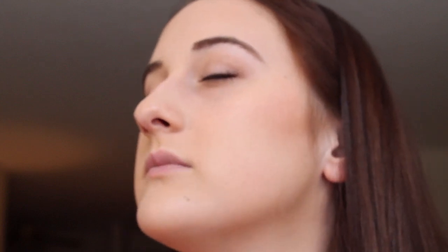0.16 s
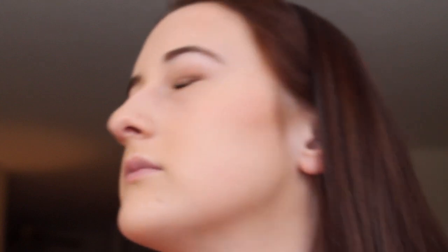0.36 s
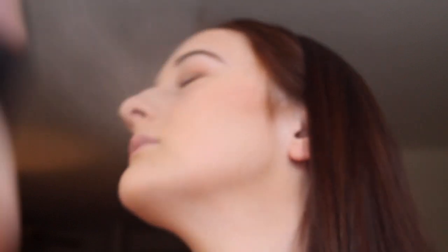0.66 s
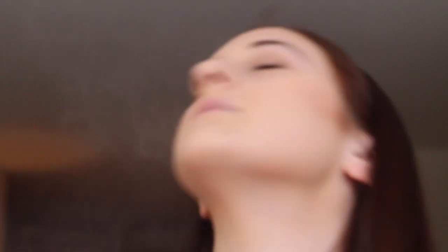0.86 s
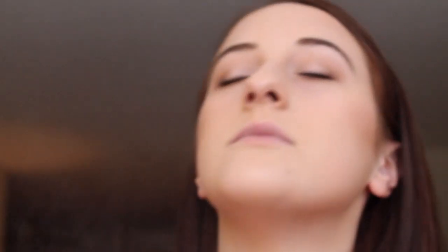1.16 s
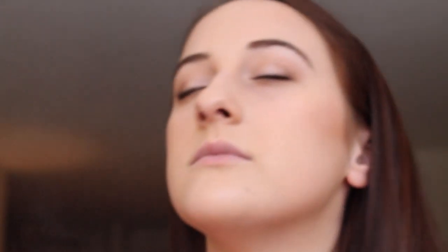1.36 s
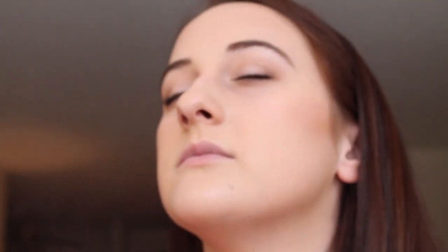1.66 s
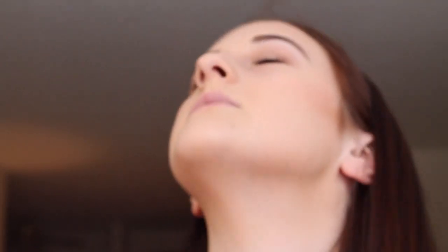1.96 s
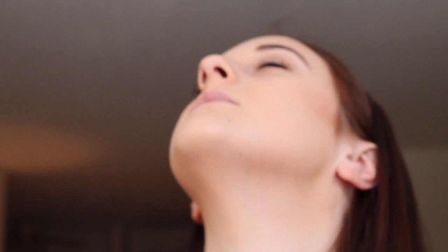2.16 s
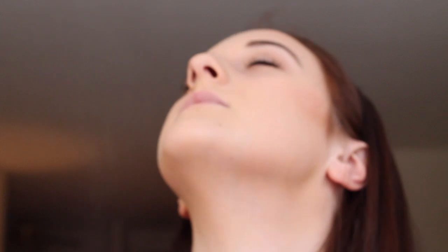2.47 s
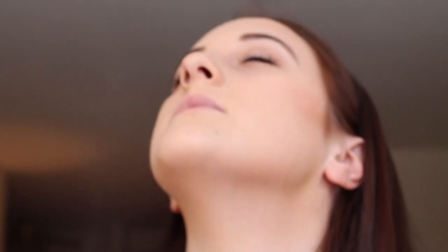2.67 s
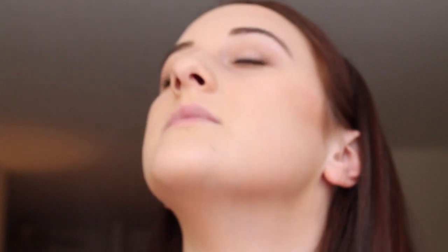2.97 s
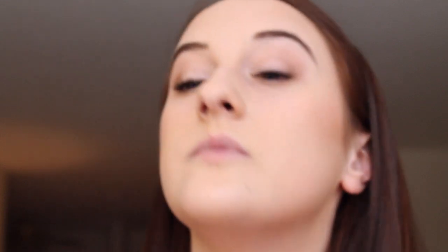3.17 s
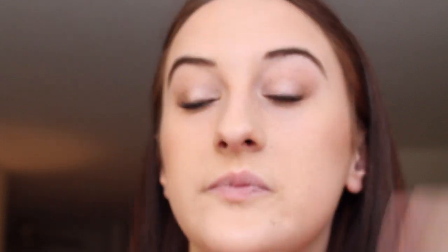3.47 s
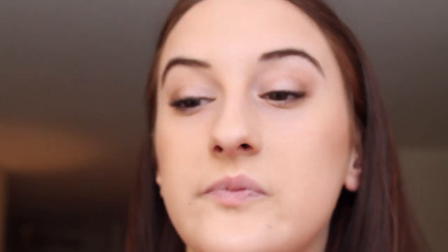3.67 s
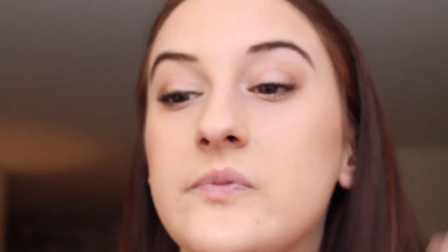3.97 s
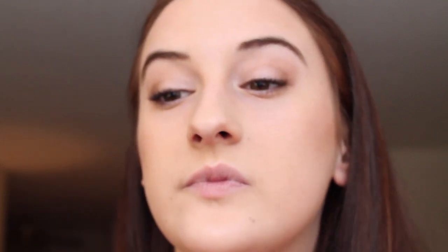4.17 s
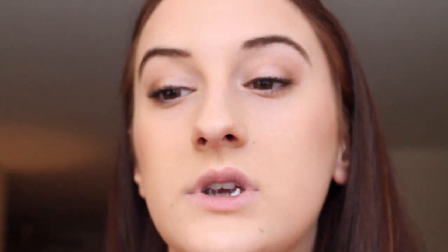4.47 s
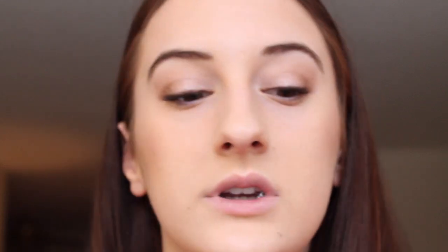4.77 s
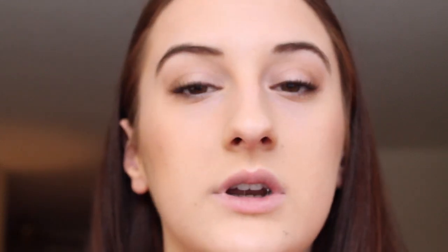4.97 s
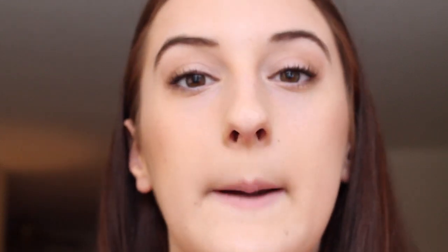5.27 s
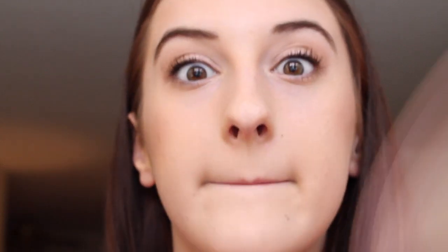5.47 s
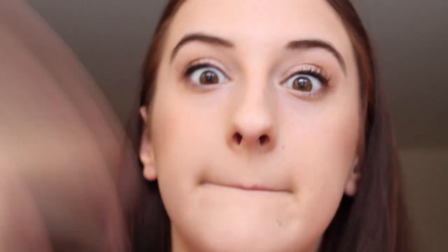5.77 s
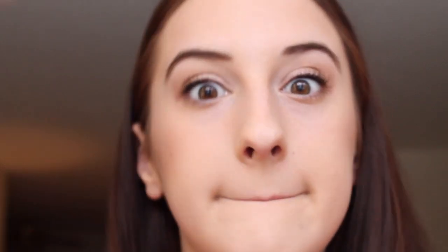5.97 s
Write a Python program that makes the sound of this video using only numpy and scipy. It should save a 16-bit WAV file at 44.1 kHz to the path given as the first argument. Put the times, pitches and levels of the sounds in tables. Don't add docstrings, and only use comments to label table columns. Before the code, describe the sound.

A small pump bottle gives five short misty spritzes with plastic clicks, then a cap snaps on and the bottle knocks onto wood.

```python
import sys
import numpy as np
from scipy import signal
from scipy.io import wavfile
from scipy.ndimage import uniform_filter1d

SR = 44100
rng = np.random.default_rng(int(sys.argv[2]) if len(sys.argv) > 2 else 0)


def unload_audio(sound):
    columns = np.transpose(np.atleast_2d(sound))
    steps = np.round(np.clip(columns, -1, 1) * 32767)
    wavfile.write(sys.argv[1], SR, steps.astype(np.int16))


def natural_amplitude(level_db):
    exponent = np.asarray(level_db, float) / 20
    return 10 ** exponent


N = 269719

# f/Hz, level/dB per Hz
HUSH_COLOUR = [(25, 3), (50, -6.5), (120, -3), (200, -0.5), (320, -0.5), (500, -3.5), (630, -6.5),
               (1000, -8.5), (2000, -16), (4000, -19.5), (8000, -24.5), (10000, -30), (15700, -31),
               (16000, -51)]
HUSH_DB = -59
WHINE_HZ, WHINE_DB = 1071, -73.5

# f/Hz, level/dB per Hz
FINGER_COLOUR = [(250, -27), (500, -7), (850, -0.5), (1500, -2.5), (2400, -1.5), (3100, -13), (5000, -18),
                 (12000, -44)]
# t/s, level/dB
FINGER_BLOWS = [
    (.3337, -21.5),
]

# t/s, peak level/dB, ring f/Hz, upper mode relative level/dB
KNOCKS = [(0.3345, -37.5, 840, -3), (0.374, -32, 734, 0.5), (0.385, -38, 790, -3), (0.396, -34.5, 776, -2),
          (0.414, -33, 880, -5), (0.558, -35, 763, -20), (0.674, -40, 860, -10), (0.694, -37, 1310, -11),
          (0.815, -23, 869, -12), (0.824, -34, 910, -8), (0.878, -40, 830, 0), (1.079, -29.5, 904, -10),
          (1.088, -37.5, 865, -5), (1.373, -29.5, 820, 2), (1.846, -37.5, 980, 2), (2.035, -43.5, 835, -11),
          (2.11, -47, 1020, 4), (2.0686, -25.5, 850, -2.5), (2.692, -43, 965, 2.5), (2.743, -44, 920, -2)]
KNOCK_T60_S = 0.022

# f/Hz, level/dB per Hz
MIST_COLOUR = [(300, -52), (700, -11.5), (1300, -4.5), (2200, 0.5), (4000, 5.5), (6500, 3.5), (8500, 0.5),
               (10500, -9), (13500, -9), (15700, -11), (16000, -48)]
# start t/s, push length/s, jet level/dB, run-down/s, fizz above 9 kHz relative level/dB
PRESSES = [
    (0.369, 0.099, -41.5, 0.061, 2.5),
    (0.635, 0.091, -39, 0.046, 6),
    (0.906, 0.079, -43, 0.073, 6.5),
    (1.193, 0.09, -44, 0.057, 2.5),
    (1.795, 0.14, -41, 0.015, 2),
]
# start t/s, length/s, hiss level/dB, run-down/s, fizz relative level/dB
REFILLS = [
    (0.534, 0.019, -53, .012, -8),
    (0.795, 0.017, -52, .01, -9),
    (1.35, 0.0072, -54, .01, -4),
    (2.035, 0.023, -57, .012, -7),
]
OPEN_DB, BUILD_SHARE, SHUT_DB = -12, 0.18, -23
FIZZ_FOLLOWS = 0.16

# t/s, peak level/dB, ring f/Hz, bright crack relative level/dB
PUMP_TICKS = [(0.398, -34, 7000, 5), (0.501, -37, 5870, -16), (0.5346, -25.5, 2860, -18),
              (0.6068, -35.5, 3590, -15), (0.6194, -49, 2900, -14), (0.634, -52, 3600, 6),
              (0.6429, -28, 3330, -14), (0.674, -49, 7040, 2), (0.694, -37, 7000, 2),
              (0.7956, -33, 4300, -1), (0.861, -47, 3060, -16), (0.8785, -31, 4500, -15),
              (1.0434, -32, 4400, -17), (1.061, -35, 2870, 0), (1.0704, -49, 3290, -14),
              (1.342, -53, 2490, -14), (1.3519, -29.5, 2840, -11), (1.8454, -43, 5300, -2),
              (2.0347, -33, 3000, -3), (2.0434, -50, 2010, -14)]
# t/s, peak level/dB, ring f/Hz, bright crack relative level/dB
HAND_TICKS = [(1.6575, -40, 4340, -20), (2.6748, -48.5, 2310, -4), (2.7106, -47, 2700, -14),
              (2.7417, -45.5, 2900, -16), (2.8218, -46, 3780, -14), (3.1968, -53, 1770, -2),
              (3.548, -49, 1890, -14), (4.3847, -48, 3920, 10), (4.3884, -24.5, 6200, -26),
              (4.4024, -55, 5930, -14), (4.4114, -50, 4180, -14), (4.4165, -45, 3940, -14),
              (4.557, -42, 1850, -10), (4.5633, -38.5, 3930, -14), (4.7803, -56, 1970, -18),
              (5.34, -54, 2000, 3)]
TICK_CYCLES, CRACK_DB = 16.6, -3

# t/s, peak level/dB, ring f/Hz, ring t60/s
BUMPS = [
    (2.353, -45, 1380, 0.034),
    (2.931, -27.5, 1700, 0.0062),
    (4.5575, -40, 1685, 0.031),
    (4.755, -44, 1590, 0.033),
    (5.315, -46.5, 404, 0.067),
    (4.770, -41, 1592, 0.037),
    (4.782, -41.5, 1580, 0.015),
]
RISE_SHARE, LOWER_DB = 0.046, -5

# f/Hz, level/dB per Hz
CAP_COLOUR = [(290, -56), (500, -27), (800, -6.5), (1450, -9), (1900, 0.5), (2800, 1.5), (3900, 3.5),
              (4800, 4.5), (6300, -0.5), (7800, -0.5), (10500, -14.5), (14500, -17), (16300, -44)]
# t/s, level/dB
CAP_BLOWS = [
    (2.9333, -6),
    (2.9342, -17),
    (2.9417, -37),
]
# f/Hz, level/dB, t60/s
CAP_MODES = [(1070, -38, 0.061), (2000, -32, 0.037), (2900, -23, 0.013), (3920, -22, 0.017),
             (4770, -26.5, 0.043), (6000, -26, 0.015), (7100, -32, 0.0096)]

# f/Hz, level/dB per Hz
TABLE_COLOUR = [(60, -53), (100, -22), (200, -14), (310, -19.5), (400, 0), (800, -3.5), (1100, -7.5),
                (1500, -10), (2000, -13), (2600, -15), (3300, -27), (4600, -27.5), (6000, -38),
                (12000, -60)]
# t/s, level/dB
TABLE_BLOWS = [
    (5.1195, -6.5),
    (5.1294, -18),
]
# f/Hz, level/dB, t60/s
TABLE_MODES = [(388.4, -20, 0.11), (590, -35, 0.086), (745, -26, 0.09), (1000, -18.5, 0.039),
               (1200, -33.5, 0.15), (1250, -47, .1), (1580, -42, 0.1), (1714, -29, 0.067),
               (2230, -34, 0.053), (2640, -57, 0.043), (4800, -42, 0.051)]

# f/Hz, t60/s
ROOM_DECAY = [(250, 0.72), (700, 0.37), (2000, 0.47), (5000, 0.42), (9000, 0.26), (16000, 0.31)]
# delay t/s, level/dB
ECHOES = [
    (.0075, -14.5),
    (.017, -30.5),
    (.042, -21.5),
]


def evened(x):
    return x / np.sqrt(np.mean(x ** 2) + 1e-20)


def read(points, hz):
    f, value = np.transpose(points)
    return np.interp(np.log(hz + 1), np.log(f + 1), value)


def add(mix, s, sound):
    part = mix[round(s * SR):][:len(sound)]
    part += sound[:len(part)]


def noise(spectrum, patchy_db, size):
    frames, hz = 4 * N // size + 5, np.fft.rfftfreq(size, 1 / SR)
    real, imaginary, patches = rng.standard_normal((frames, len(hz), 3)).T
    patches = uniform_filter1d(patches, size=8, axis=0)
    patches = evened(uniform_filter1d(patches, size=8, axis=1))
    gain = natural_amplitude(read(spectrum, hz)[:, None] + patchy_db * patches)
    z = (real + 1j * imaginary) * gain
    return evened(signal.istft(z, nperseg=size, noverlap=3 * size // 4)[1][:N])


def ring(hz, t60, rise):
    t = np.arange(SR // 4) / SR
    decay = natural_amplitude(-60 * t / max(t60, .001))
    return decay * np.sin(2 * np.pi * hz * t) * (1 - np.exp(-t / rise))


def crack(low_hz, high_hz, t60):
    t = np.arange(SR // 4) / SR
    puff = natural_amplitude(-19) * rng.standard_normal(len(t)) * natural_amplitude(-60 * t / t60) + (t == 0)
    band = signal.butter(2, [low_hz, min(high_hz, .45 * SR)], "band", fs=SR, output="sos")
    burst = signal.sosfilt(band, puff)
    return burst / abs(burst).max()


def causal(spectrum):
    hz = abs(np.fft.fftfreq(4096, 1 / SR))
    log_gain = np.log(natural_amplitude(read(spectrum, hz)))
    phase = -signal.hilbert(log_gain).imag
    taps = np.fft.ifft(np.exp(log_gain + 1j * phase)).real[:2048]
    return taps / abs(taps).max()


def struck(colour, blows, chatter_db, chatter_t60, contact_s):
    drive, t = np.zeros(N), np.arange(SR // 4) / SR
    push = t * np.exp(-t / contact_s) + 1e-12 * (t == 0)
    for s, blow_db in blows:
        chatter = natural_amplitude(chatter_db - 60 * t / chatter_t60) * rng.standard_normal(len(t))
        add(drive, s, natural_amplitude(blow_db) * (chatter + push / push.sum()))
    return signal.oaconvolve(drive, causal(colour))[:N]


def hush():
    t = np.arange(N) / SR
    r = np.exp(-np.pi * 3 / SR)
    waver = 1 + 0.43 * evened(signal.lfilter([1 - r], [1, -r], rng.standard_normal(N)))
    whine = evened(waver * np.sin(2 * np.pi * WHINE_HZ * t))
    air = noise(HUSH_COLOUR, patchy_db=1.46, size=1024)
    return natural_amplitude(HUSH_DB) * air + natural_amplitude(WHINE_DB) * whine


def finger():
    return struck(FINGER_COLOUR, FINGER_BLOWS, chatter_db=-24.5, chatter_t60=0.023, contact_s=.00001)


def knocks():
    out = np.zeros(N)
    for s, db, hz, upper_db in KNOCKS:
        low = ring(hz, KNOCK_T60_S, 0.00057)
        upper = natural_amplitude(upper_db) * ring(1.54 * hz, .5 * KNOCK_T60_S, 0.00095)
        middle = natural_amplitude(-7.5) * ring(1.238 * hz, 1.18 * KNOCK_T60_S, 0.00055)
        add(out, s, natural_amplitude(db + 1.5) * (low + upper + middle))
    return out


def spray():
    t, level, fizz = np.arange(N) / SR, np.zeros(N), np.zeros(N)
    for s, push, db, fall, fizz_db in PRESSES + REFILLS:
        inside = (t > s) & (t < s + push + 2 * fall)
        u = t[inside] - s
        opening_db = OPEN_DB * np.exp(-u / (BUILD_SHARE * push))
        closing_db = SHUT_DB * (np.maximum(u - push, 0) / fall) ** 1.03
        pressure_db = opening_db + closing_db
        level[inside] += natural_amplitude(db + pressure_db) * np.minimum(u / .003, 1)
        fizz[inside] = natural_amplitude(fizz_db + FIZZ_FOLLOWS * pressure_db)
    droplets = natural_amplitude(0.46 * evened(uniform_filter1d(rng.standard_normal(N), size=30)))
    mist = evened(noise(MIST_COLOUR, patchy_db=1.1, size=256) * droplets)
    top = signal.sosfiltfilt(signal.butter(4, 9500, "high", fs=SR, output="sos"), mist)
    return level * (mist + (fizz - 1) * top)


def ticks():
    out = np.zeros(N)
    for s, db, hz, bright_db in PUMP_TICKS + HAND_TICKS:
        body = ring(hz, TICK_CYCLES / hz, 0.000067)
        wide = natural_amplitude(CRACK_DB) * crack(3720, 7600, 0.011)
        bright = natural_amplitude(bright_db) * crack(10500, 17300, 0.006)
        add(out, s, natural_amplitude(db + 1.5) * (body + wide + bright))
    return out


def bumps():
    out = np.zeros(N)
    for s, db, hz, t60 in BUMPS:
        rise = RISE_SHARE * t60
        body = ring(hz, t60, rise) + natural_amplitude(LOWER_DB) * ring(0.637 * hz, 1.23 * t60, rise)
        grip = 1 + 0.4 * evened(uniform_filter1d(rng.standard_normal(len(body)), size=40))
        add(out, s, natural_amplitude(db + 4) * body * grip)
    return out


def cap():
    out = struck(CAP_COLOUR, CAP_BLOWS, chatter_db=-18, chatter_t60=0.018, contact_s=.00001)
    shell = sum(natural_amplitude(db) * ring(hz, t60, 0.0006) for hz, db, t60 in CAP_MODES)
    add(out, CAP_BLOWS[0][0], shell)
    return out


def table():
    out = struck(TABLE_COLOUR, TABLE_BLOWS, chatter_db=-20, chatter_t60=0.04, contact_s=.00006)
    wood = sum(natural_amplitude(db) * ring(hz, t60, 0.00062) for hz, db, t60 in TABLE_MODES)
    add(out, TABLE_BLOWS[0][0], wood)
    return out


def room(x, tail_db):
    taps = np.zeros(SR)
    at = np.arange(160, SR - 20, 20)
    taps[at + rng.integers(0, 20, len(at))] = rng.choice([-1., 1.], len(at))
    hz, t, z = signal.stft(taps, SR, nperseg=256)
    decay = natural_amplitude(-60 * t / read(ROOM_DECAY, hz)[:, None])
    tail = signal.istft(z * decay, SR, nperseg=256)[1]
    tail = natural_amplitude(tail_db) * tail / np.linalg.norm(tail)
    smear = rng.standard_normal((len(ECHOES), 800)) * natural_amplitude(-60 * np.arange(800) / SR / 0.023)
    dull = signal.lfilter(*signal.butter(2, 7000, fs=SR), smear)
    for (s, db), echo in zip(ECHOES, dull):
        add(tail, s, natural_amplitude(db) * echo / np.linalg.norm(echo))
    return signal.fftconvolve(x, tail)[:N]


def scene():
    small = signal.butter(2, 280, "high", fs=SR, output="sos")
    near = signal.sosfilt(small, finger() + knocks() + spray() + ticks() + bumps())
    far = signal.sosfilt(small, cap() + table())
    reverb = room(natural_amplitude(-3.0) * near + far, tail_db=-10.0)
    return (near + far + reverb + hush())[None]


def band_limit(x):
    return signal.sosfilt(signal.butter(12, 16650, fs=SR, output="sos"), x)


def record(dry):
    thin = signal.sosfilt(signal.butter(2, 70, "high", fs=SR, output="sos"), dry)
    edge = signal.firwin(255, 16500, fs=SR)
    mix = signal.oaconvolve(thin, edge[None], "same")
    return band_limit(mix)


dry = scene()
out = record(dry)
unload_audio(out)
```